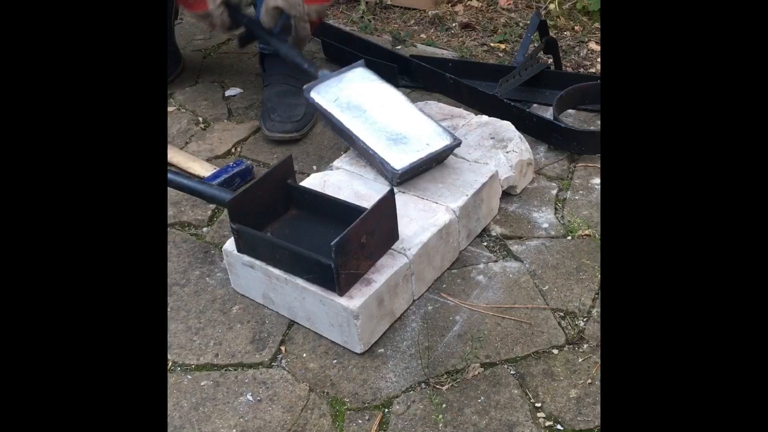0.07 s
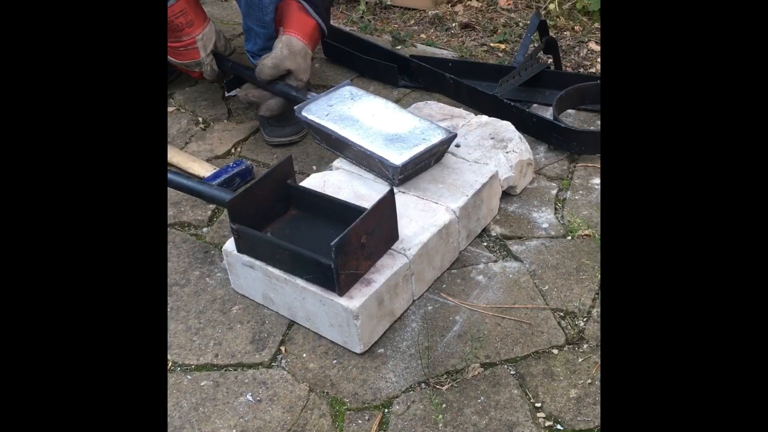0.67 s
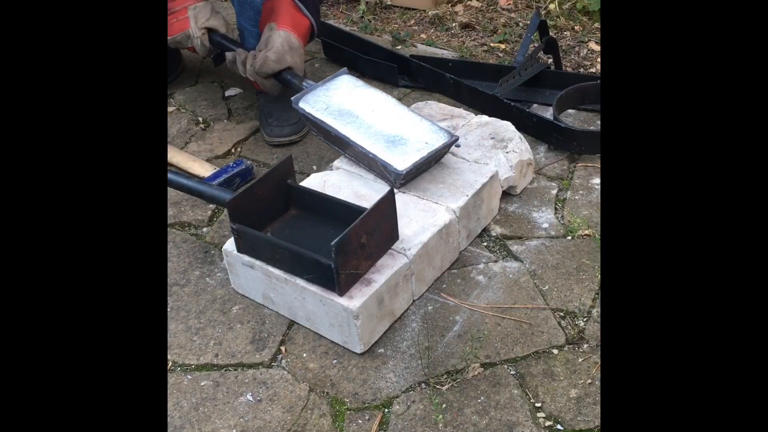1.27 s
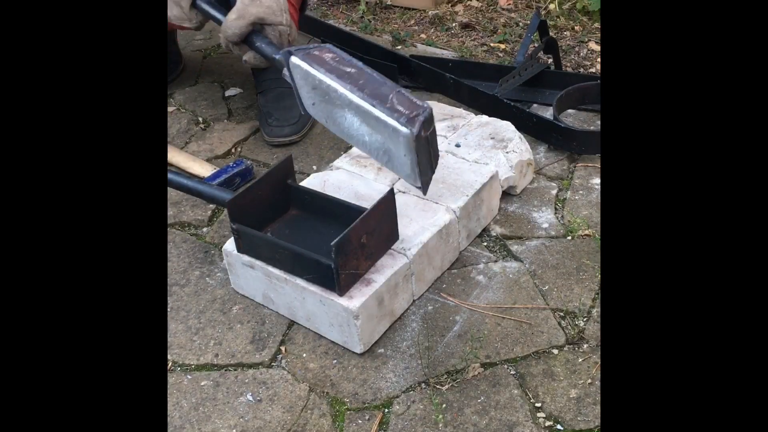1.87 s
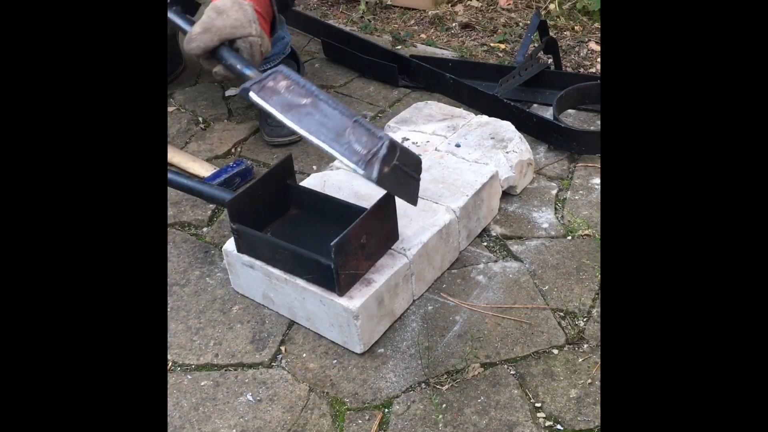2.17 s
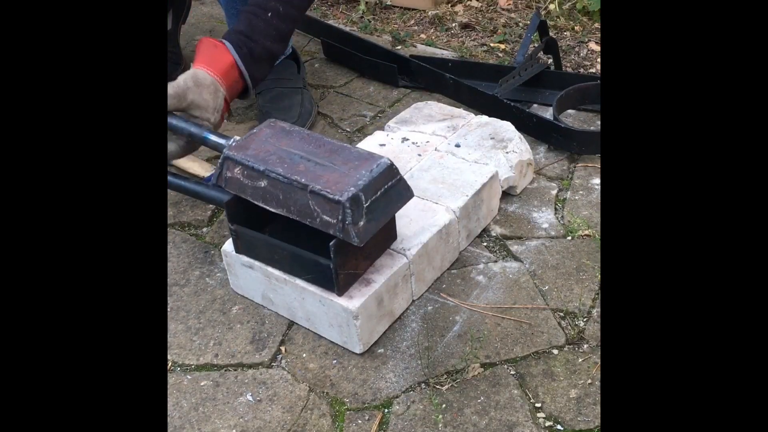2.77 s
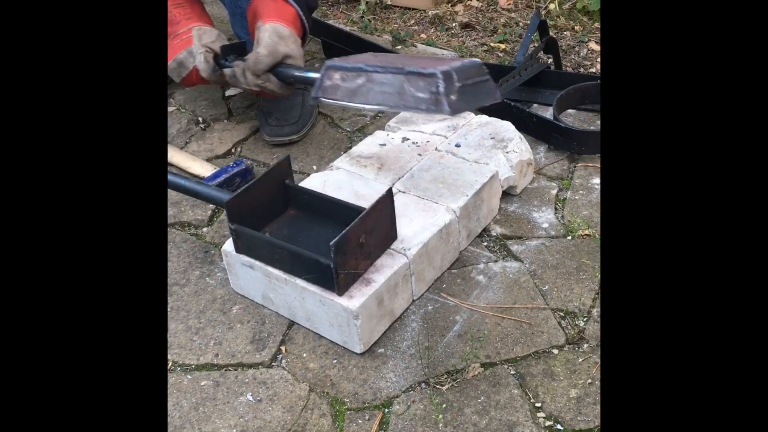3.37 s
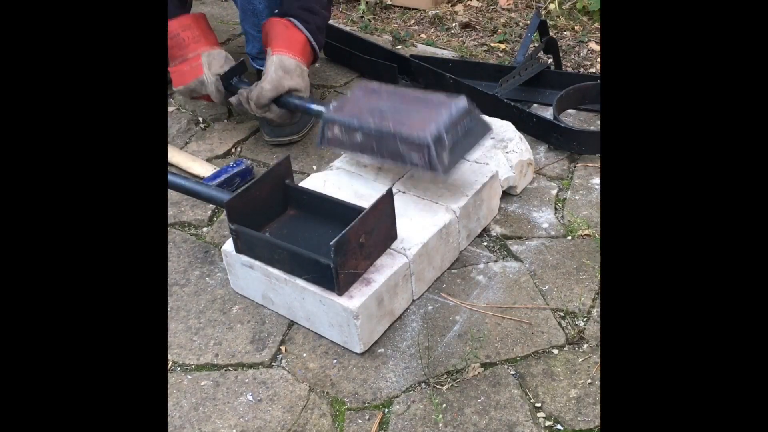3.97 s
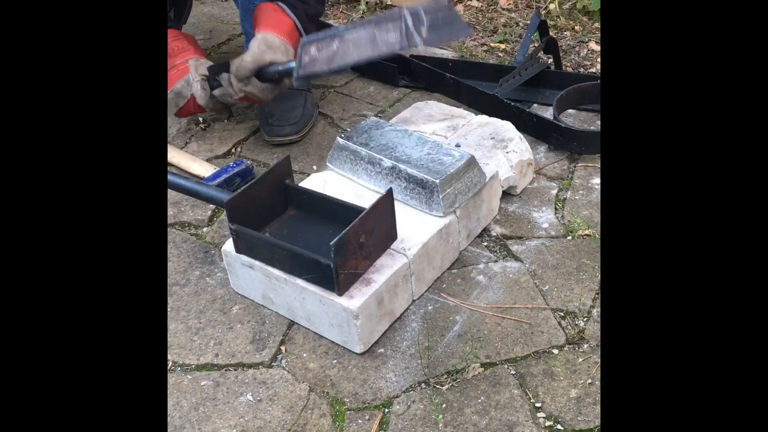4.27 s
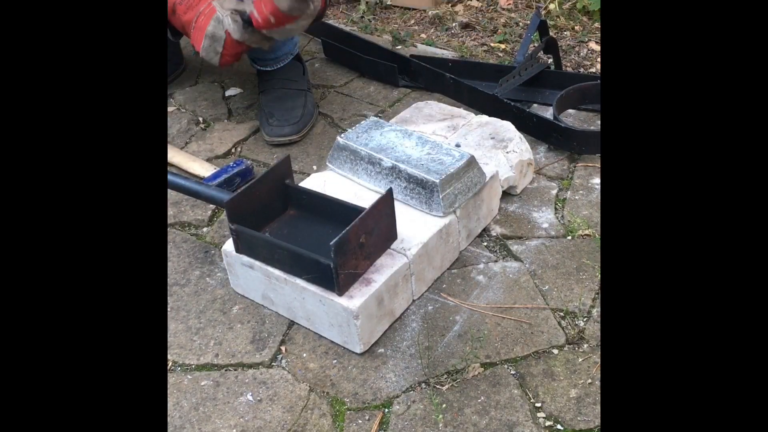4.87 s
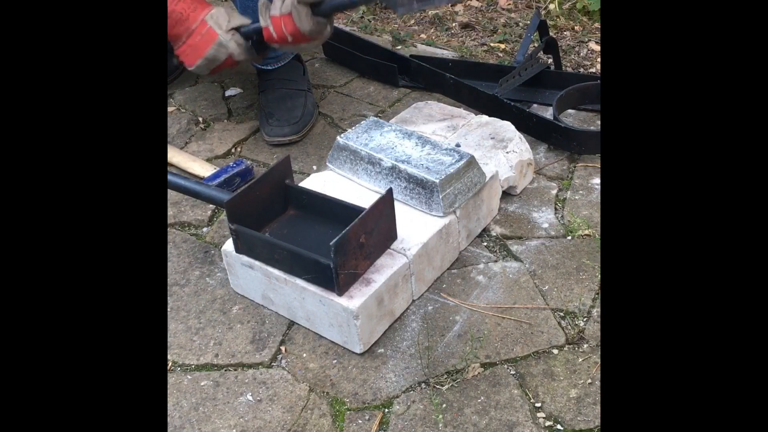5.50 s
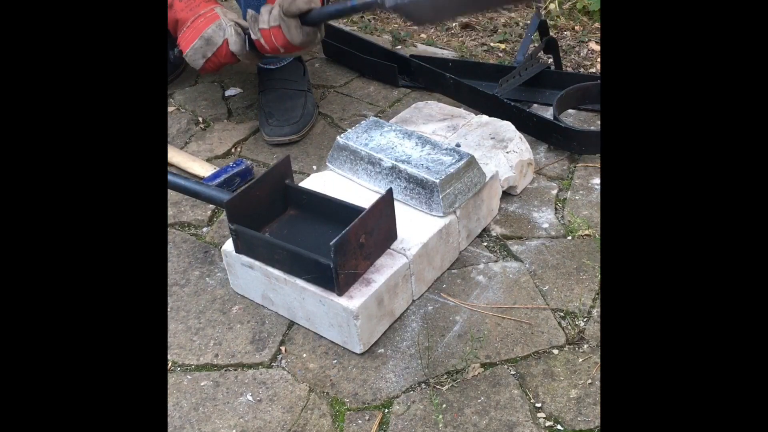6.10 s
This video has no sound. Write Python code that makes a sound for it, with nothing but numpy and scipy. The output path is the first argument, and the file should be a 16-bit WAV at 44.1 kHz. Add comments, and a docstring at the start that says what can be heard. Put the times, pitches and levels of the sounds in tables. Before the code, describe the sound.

Sharp metal clanks and clacks as a steel mould is knocked on a tray and brick, over a low furnace roar.

```python
"""Outdoors on paving, a low steady roar, probably a gas furnace, sounds throughout: turbulent noise
coloured by resonances. Gloves rub and grit scuffs as a steel mould with a cast ingot in it is turned
over. At 2 s it clips a steel tray and is then banged on the rim, exciting the tray's normal modes.
From 3.7 s it is struck twice on a firebrick, clacking briefly because the ingot damps it. At the last
blow the ingot drops out and the empty mould rings on; faint rubbing follows."""
import sys
import numpy as np
from scipy import signal
from scipy.fft import rfft, irfft
from scipy.io import wavfile
from scipy.ndimage import uniform_filter1d, minimum_filter1d

SR = 44100
rng = np.random.default_rng(int(sys.argv[2]) if len(sys.argv) > 2 else 0)


def wrap_up_sound(samples):
    """Save the sound to the file named by the first command line argument, as 16-bit audio."""
    columns = np.atleast_2d(samples).T
    # keep every value between -1 and 1, then stretch to whole-number steps
    tamed = np.clip(columns, -1, 1)
    steps = np.round(tamed * 32767).astype(np.int16)
    wavfile.write(sys.argv[1], SR, steps)


N = 275184

# spectrum of sliding friction: frequency_hz, density_db
FRICTION_SPECTRUM = [(1500, -20), (3000, 4.5), (6000, -4.5), (9000, -4.5), (15000, -6)]


def undb(db):
    """Amplitude ratio of a level in decibels."""
    return 10 ** (np.asarray(db) / 20)


def decay(t, t60):
    """Exponential damping: the level falls 60 dB in t60 seconds."""
    return np.exp(-np.log(1000) * t / t60)


def add(track, start_s, sound):
    """Superposition: a sound adds to the track from start_s on."""
    i = max(int(start_s * SR), 0)
    track[i:i + len(sound)] += sound[:N - i]


def freqs(size):
    """Frequency of each Fourier bin, at least 1 Hz."""
    return np.maximum(np.fft.rfftfreq(size, 1 / SR), 1)


def colour(points, f, tilt_db=0):
    """Spectral envelope as a gain at f; contact hardness tilts it above 800 Hz by tilt_db per octave."""
    hz, db = np.transpose(points)
    return undb(np.interp(np.log(f), np.log(hz), db) + tilt_db * np.log2(np.maximum(f, 800) / 2000))


def shaped(x, gain):
    """Linear filtering by a gain per bin, scaled to rms 1."""
    filtered = irfft(rfft(x) * gain, len(x))
    return filtered / np.sqrt(np.mean(filtered ** 2))


def furnace(level_db=-28, flutter_db=0.53, flutter_hz=6):
    """Forced resonance: turbulent flame noise drives the furnace and its pipe, and flutters a little."""
    # spectrum of the roar and the air around it: frequency_hz, density_db
    spectrum = [(22, -52), (45, -17), (90, -3.5), (130, -5), (225, -0.5), (340, -20), (450, -23.5),
                (730, -21), (950, -31.5), (2100, -45), (2800, -46.5), (4500, -51.5), (6100, -47.5),
                (7500, -53.5), (15000, -61.5)]
    # resonances of the furnace and burner pipe: centre_hz, width_hz, boost_db
    resonances = [(163.5, 27.3, 3.5), (187, 14.6, 2.5), (230.4, 9.8, 1.5), (242.5, 18, -4),
                  (284.7, 24, 6.5), (795, 39, 10), (1358, 63, 12), (1484, 63, 15), (1736, 49, 13),
                  (1978, 153, 10.5), (2356, 210, 16), (2865, 170, 3.5), (3322, 86, 9.5), (5920, 36, 8)]
    f = freqs(N)
    boost_db = sum(db * np.exp(-2 * ((f - hz) / width) ** 2) for hz, width, db in resonances)
    roar = shaped(rng.standard_normal(N), colour(spectrum, f) * undb(boost_db))
    flutter = shaped(rng.standard_normal(N), np.exp(-(f / flutter_hz) ** 2))
    return roar * undb(level_db + flutter_db * flutter)


def yard(x, level_db=-22.5, t60=0.2, delay_s=.012, dull_hz=6000):
    """Diffuse reflection: paving, fences and walls return a faint, dull tail."""
    t = np.arange(SR) / SR
    echoes = shaped(rng.standard_normal(SR), 1 / np.hypot(1, freqs(SR) / dull_hz))
    echoes = echoes * decay(t, t60) * (t > delay_s)
    return undb(level_db) * signal.fftconvolve(x, echoes / np.sqrt(np.sum(echoes ** 2)))[:N]


def rubbing(grain_db=3.5, tilt_db=2, fitful_db=4.5, fitful_hz=9):
    """Stick-slip friction: gloves and mould creep in fits and starts as the grip shifts."""
    # course of the rubbing: time_s, level_db
    contour = [(0, -62.5), (.33, -61), (.45, -76), (1.1, -70), (1.22, -60), (1.55, -71.5), (4.9, -75),
               (5.15, -69), (6.24, -83)]
    f = freqs(N)
    slips = rng.standard_normal(N) * undb(grain_db * np.minimum(rng.exponential(size=N), 2 * np.pi))
    fits = shaped(rng.standard_normal(N), np.exp(-(f / fitful_hz) ** 2))
    level_db = np.interp(np.arange(N) / SR, *np.transpose(contour)) + fitful_db * fits
    return undb(level_db) * shaped(slips, colour(FRICTION_SPECTRUM, f, tilt_db))


def plate_pitches(count=56):
    """Constant modal density: a plate's upper modes lie about evenly in frequency."""
    return np.linspace(2400, 15300, count) + rng.uniform(-110, 110, count)


def overtones(pitches, t60, tilt_db, spread_db=5):
    """Modal superposition: each contact rings the upper modes in a new mix, starting near rms 1."""
    # envelope of the steel's upper modes: frequency_hz, level_db
    spectrum = [(2200, 6), (3500, -12), (6000, 3.5), (8000, -2), (11000, -1), (15000, -9)]
    t = np.arange(SR // 2) / SR
    phase, strength, life = rng.random((len(pitches), 3)).T[:, :, None]
    hz = pitches[:, None]
    gain = colour(spectrum, hz, tilt_db) * undb(2 * spread_db * strength)
    waves = gain * np.sin(2 * np.pi * (hz * t + phase)) * decay(t, t60 * (.5 + life))
    return np.pad(waves.sum(0) / np.sqrt(np.sum(gain ** 2) / 2), (0, SR - len(t)))


def scuffs(grain_db=2, firm_db=-47, ring_db=-3, ring_t60=0.1):
    """Frictional excitation: short drags over grit join the rubbing, and both ring the steel."""
    # drags of the mould: start_s, level_db, length_s
    drags = [(0.228, -52, 0.034), (.339, -42, 0.013), (0.783, -45, 0.015), (0.926, -52, 0.0084),
             (2.102, -48, 0.023), (2.2, -55, .03), (2.65, -50.5, 0.029), (3.505, -56, 0.016)]
    friction, size = rubbing(), SR // 2
    t = np.arange(size) / SR
    for start_s, level_db, length_s in drags:
        tilt_db = 0.99 * (firm_db - level_db)  # a lighter scuff is brighter
        slips = rng.standard_normal(size) * undb(grain_db * rng.exponential(size=size))
        grit = shaped(slips, colour(FRICTION_SPECTRUM, freqs(size), tilt_db))
        swell = 3 * t / length_s
        add(friction, start_s, undb(level_db) * swell * np.exp(1 - swell) * grit)
    body = overtones(plate_pitches(), ring_t60, tilt_db=4.5)
    ringing = signal.fftconvolve(friction, body / np.sqrt(np.sum(body ** 2)))[:N]
    return friction + undb(ring_db) * ringing


def ring(modes, t60_factor, tilt_db, sway_db=-2, sway_hz=3.2):
    """Free vibration: each mode is a damped sine; a pressed contact rings shorter, a soft one duller."""
    t = np.arange(SR) / SR
    out = 0
    for k, (hz, t60, db) in enumerate(modes):
        # the metal keeps moving: partials swell and dip as their lobes pass, the higher ones faster
        sway = sway_db * (-1) ** k * np.sin(2 * np.pi * sway_hz * np.sqrt(hz / 2000) * t)
        gain = undb(db + sway + tilt_db * np.log2(hz / 2000))
        out = out + (-1) ** k * gain * np.sin(2 * np.pi * hz * t) * decay(t, t60 * t60_factor)
    return out


def crash(outline, t60, tilt_db, treble_damping):
    """Modal overlap: overtones too dense to resolve form noise whose higher octaves die sooner."""
    t, f = np.arange(SR) / SR, freqs(SR)
    spectrum = rfft(shaped(rng.standard_normal(SR), colour(outline, f, tilt_db)))
    out = 0
    for hz in 125 * 2 ** np.arange(8):
        band = irfft(spectrum * np.maximum(1 - abs(np.log2(f / hz)), 0), SR)
        out = out + band * decay(t, t60 * (2000 / hz) ** treble_damping)
    return out


def contacts(hits, rebound, bounces, first_gap_s=.0075, restitution=.8):
    """Inelastic rebound: a chattering blow comes back ever sooner, weaker and brighter."""
    lands_on, ring_over_crash_db, crash_step_db, tilt_step_db = rebound
    for start_s, kind, ring_db, crash_db, tilt_db, chatters in hits:
        yield start_s, kind, ring_db, crash_db, tilt_db
        for k in range(bounces if chatters else 0):
            start_s += first_gap_s * restitution ** k
            crash_db += crash_step_db
            tilt_db += tilt_step_db
            yield start_s, lands_on, ring_over_crash_db + crash_db, crash_db, tilt_db


def blows(hits, modes, outline, overtone_db, overtone_t60, crash_t60, treble_damping, contact_s):
    """Impact excitation: crash, ring and overtones build up over the time of contact, then decay."""
    # how freely the metal rings after each kind of contact: kind, t60_factor
    freedom = {"wall": 1.29, "rim": 0.73, "corner": 1, "full": 0.97, "empty": 1.2}
    out, pitches = np.zeros(N), plate_pitches()
    attack = 1 - np.exp(-np.arange(SR) / SR / contact_s)
    for start_s, kind, ring_db, crash_db, tilt_db in hits:
        upper = overtones(pitches, overtone_t60[kind] * freedom[kind], tilt_db)
        tones = ring(modes[kind], freedom[kind], tilt_db) + undb(overtone_db[kind]) * upper
        t60 = crash_t60 * 2 ** (-crash_db / 45)  # a light touch slides on: 45 dB weaker, twice as long
        noise = crash(outline, t60, tilt_db, treble_damping)
        add(out, start_s, attack * (undb(ring_db) * tones + undb(crash_db) * noise))
    return out


def tray():
    """Mode shapes: the place of the blow decides how strongly each mode of the steel tray answers."""
    # modes of the tray: pitch_hz, t60_s, wall_db, rim_db, corner_db
    tray_modes = [(790, .55, -42, -34, -60), (977, .24, -25, -35, -60), (1296, .32, -32, -16.5, -60),
                  (1420, .07, -29, -11, -60), (1497, .075, -36, -9, -60), (1647, .28, -30, -8, -60),
                  (1955, .18, -34, -27, -60), (2085, .1, -26, -24, -60), (2289, .08, -32, -16, -60),
                  (2735, .07, -31, -17, -60), (2955, .3, -47, -18, -60), (3314, .17, -34, -26, -48),
                  (3991, .22, -26, -15, -60), (4342, .28, -38, -11, -41), (4583, .2, -40, -30, -60),
                  (4727, .3, -54, -28, -62), (4872, .17, -35, -29, -60), (5405, .15, -39, -16, -56),
                  (5507, .15, -46, -32, -39), (5655, .24, -54, -31, -47), (6528, .2, -33, -33, -64),
                  (6700, .11, -44, -21, -60), (7021, .085, -48, -21, -60), (7140, .22, -39, -34, -55),
                  (7525, .16, -41, -35, -62), (7695, .2, -54, -38, -47), (9480, .1, -48, -24, -66),
                  (10988, .28, -66, -35, -70), (11832, .16, -37, -46, -75), (12286, .12, -56, -32, -64)]
    # mould on tray: start_s, place, ring_db, crash_db, tilt_db_per_octave, chatters
    hits = [(2.0378, "wall", -3, -18.5, 0.5, False), (2.5004, "rim", -1, -9.5, -.5, True),
            (2.6165, "wall", -26, -30, -3.5, False), (2.7138, "corner", -14, -42, 1, False),
            (2.7690, "rim", -26, -27, -5.5, False), (2.8565, "corner", -8, -46, 1.5, False)]
    # each rebound: place, ring_over_crash_db, crash_step_db, tilt_step_db_per_octave
    rebound = ("corner", 13.4, -2, 2.1)
    # crash of steel on steel: frequency_hz, density_db
    crash_spectrum = [(150, 6), (400, -11), (900, -2.5), (1500, 10.5), (2500, -1), (4500, -6), (6100, -14),
                      (7000, -10.5), (9500, -20.5), (15000, -50)]
    # upper modes within the ring: place, level_db
    overtone_db = {"wall": -34.5, "rim": -19, "corner": -40}
    hz, t60, *levels = np.transpose(tray_modes)
    modes = {place: list(zip(hz, t60, db)) for place, db in zip(("wall", "rim", "corner"), levels)}
    return blows(contacts(hits, rebound, bounces=3), modes, crash_spectrum, overtone_db,
                 overtone_t60={"wall": .13, "rim": .13, "corner": .22},
                 crash_t60=0.06, treble_damping=0.09, contact_s=0.00058)


def mould():
    """Contact damping: the full mould clacks on the brick; once the ingot is out it rings freely."""
    # modes of the mould damped by the ingot: pitch_hz, t60_s, level_db
    full_modes = [(635, .06, -20), (996, .06, -15), (1426, .04, -17), (1770, .045, -11), (1850, .04, -7),
                  (2742, .07, -21), (3290, .13, -26), (3970, .075, -18), (4884, .055, -16),
                  (6513, .11, -22), (6653, .06, -18), (7000, .06, -23), (7684, .06, -26), (9406, .1, -33),
                  (10186, .09, -35), (12850, .08, -38), (13790, .1, -42)]
    # modes of the empty mould: pitch_hz, t60_s, level_db
    empty_modes = [(1033, .2, -23), (1493, .58, -32), (1996, .5, -27), (2126, .66, -27), (2731, .33, -27),
                   (3193, .52, -23), (3278, .45, -28), (3749, .22, -28), (3963, .45, -36), (4772, .17, -29),
                   (5399, .22, -33), (6538, .22, -29), (7887, .17, -27), (8648, .12, -29), (8909, .11, -27),
                   (8995, .13, -28), (9745, .25, -42), (12189, .25, -46), (12760, .27, -52),
                   (13941, .3, -52), (14070, .25, -52)]
    # mould or ingot on brick: start_s, state, ring_db, crash_db, tilt_db_per_octave, chatters
    hits = [(3.6845, "full", -1, -8.5, 1.5, True), (4.0525, "full", -1, -5.5, -1.5, False),
            (4.0635, "empty", -3, -6, 1.5, True), (4.1390, "full", -18, -30, -4.5, False)]
    # each rebound: state, ring_over_crash_db, crash_step_db, tilt_step_db_per_octave
    rebound = ("full", -20, -8.5, 2.2)
    # crash of metal on brick: frequency_hz, density_db
    crash_spectrum = [(150, -16), (400, -2.5), (650, -8), (850, -4), (1700, 3.5), (2500, -5), (4500, -8),
                      (5700, -17), (7000, -8), (10000, -31), (15000, -39)]
    # upper modes within the ring: state, level_db
    overtone_db = {"full": -29, "empty": -28.5}
    modes = {"full": full_modes, "empty": empty_modes}
    return blows(contacts(hits, rebound, bounces=2), modes, crash_spectrum, overtone_db,
                 overtone_t60={"full": .08, "empty": .16},
                 crash_t60=0.042, treble_damping=0.092, contact_s=0.00053)


def scene(blow_db=2.0):
    """Superposition of the metalwork close by, its scatter in the yard and the furnace behind."""
    work = undb(blow_db) * (tray() + mould()) + scuffs()
    return (work + yard(work) + furnace())[None]


def limiter(x, limit_db, release_db_per_s):
    """Peak limiting: the gain ducks just ahead of each peak, then recovers at a steady pace."""
    headroom_db = np.minimum(limit_db - 20 * np.log10(np.abs(x) + 1e-9), 0)
    ahead_db = minimum_filter1d(headroom_db, size=24)
    recovery_db = release_db_per_s * np.arange(N) / SR
    gain_db = np.minimum.accumulate(ahead_db - recovery_db, axis=-1) + recovery_db
    return x * undb(uniform_filter1d(gain_db, size=24))


def record(dry, limit_db=4, ceiling=1.13, top_hz=15850):
    """Limiting and soft saturation round the loudest peaks; a steep low-pass cuts the top."""
    held = limiter(dry, limit_db, release_db_per_s=1500)
    rounded = ceiling * np.tanh(held / ceiling)
    return signal.sosfilt(signal.ellip(10, .2, 80, top_hz, fs=SR, output="sos"), rounded)


dry = scene()
out = record(dry)
wrap_up_sound(out)
```